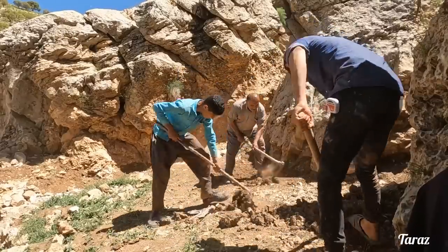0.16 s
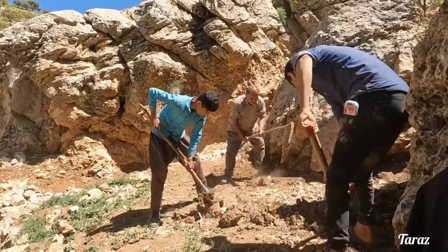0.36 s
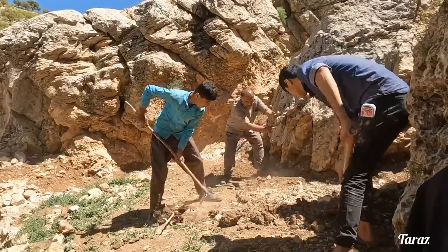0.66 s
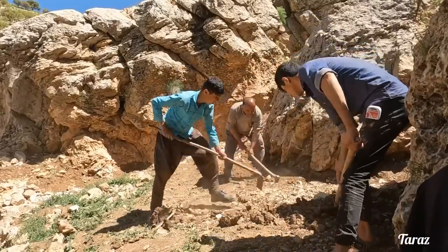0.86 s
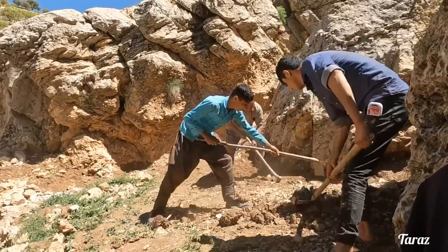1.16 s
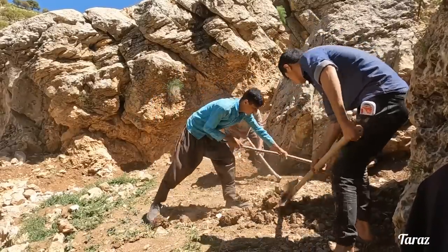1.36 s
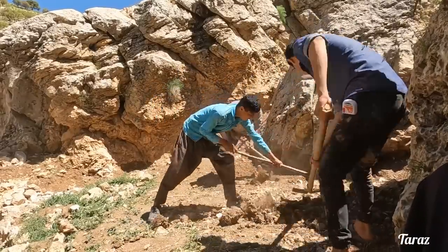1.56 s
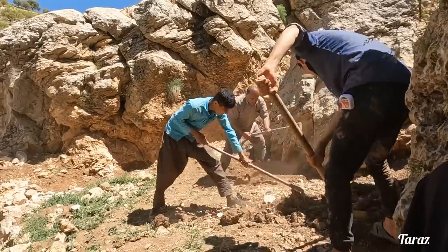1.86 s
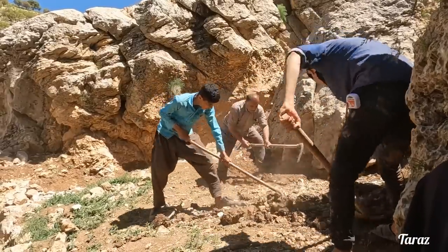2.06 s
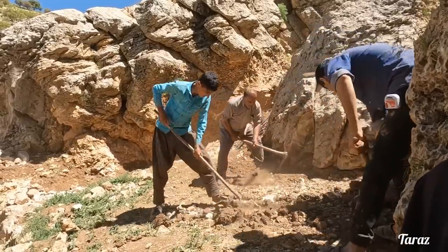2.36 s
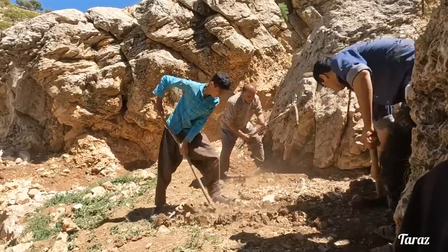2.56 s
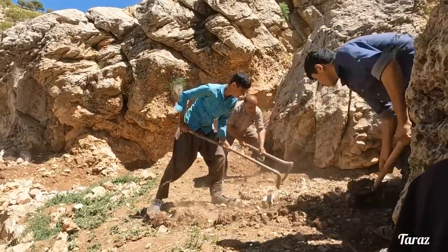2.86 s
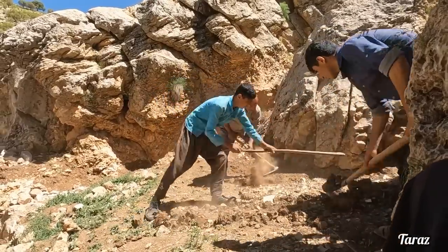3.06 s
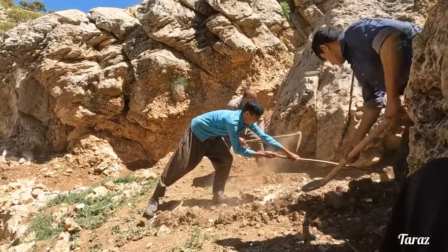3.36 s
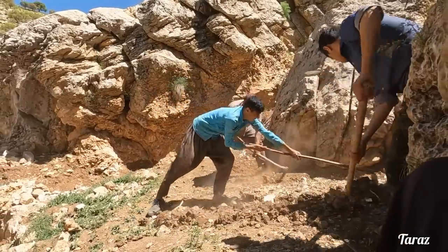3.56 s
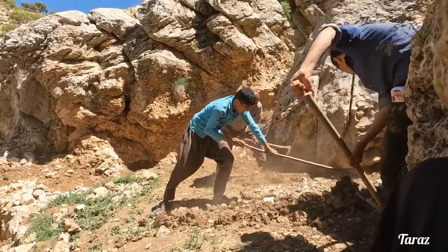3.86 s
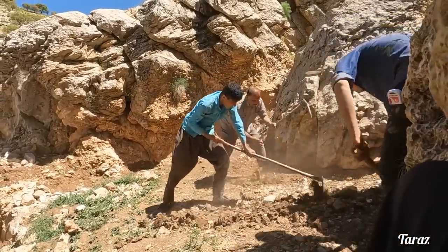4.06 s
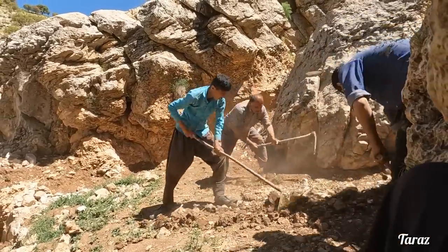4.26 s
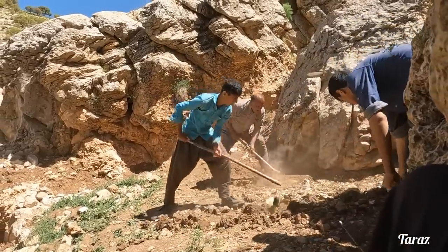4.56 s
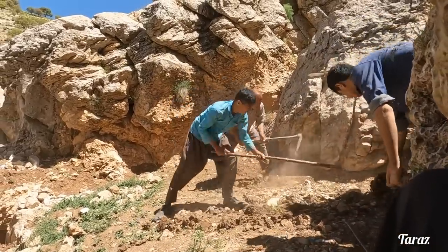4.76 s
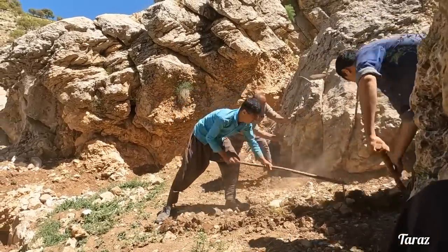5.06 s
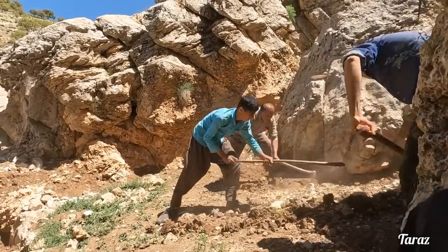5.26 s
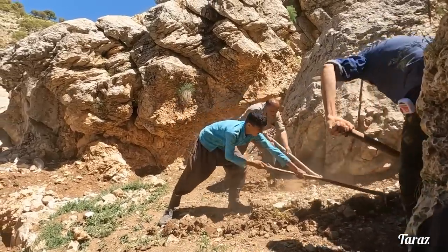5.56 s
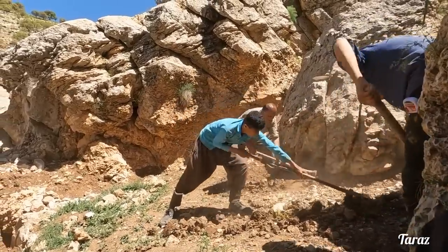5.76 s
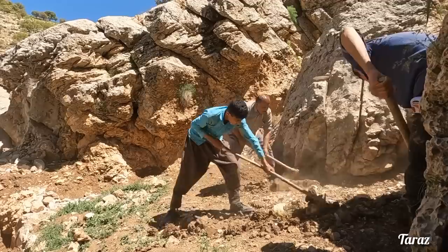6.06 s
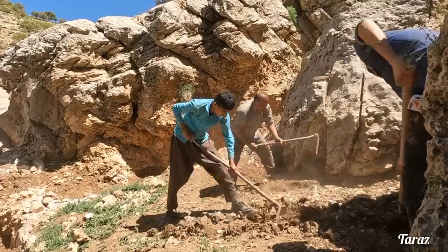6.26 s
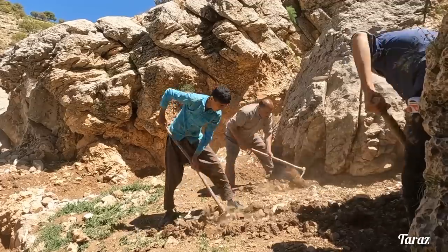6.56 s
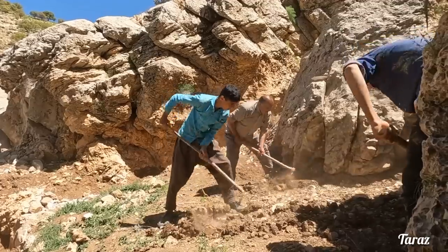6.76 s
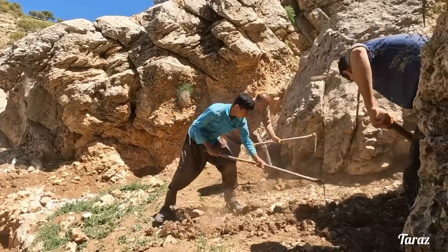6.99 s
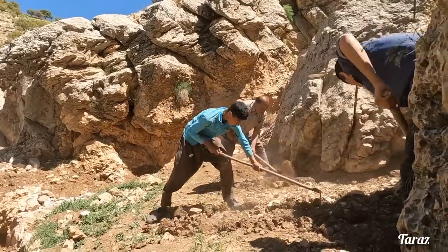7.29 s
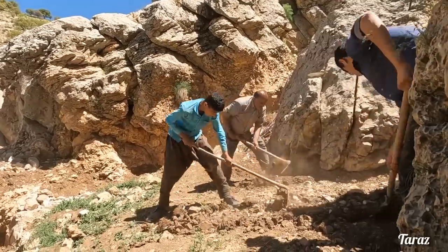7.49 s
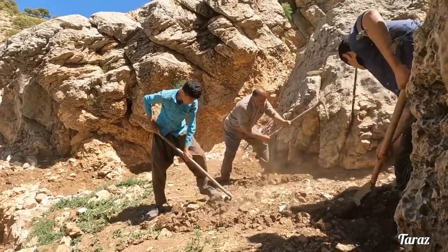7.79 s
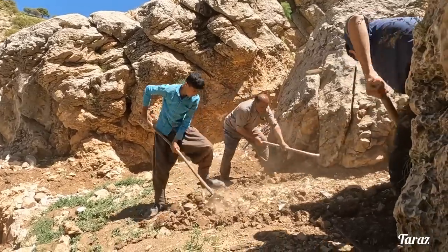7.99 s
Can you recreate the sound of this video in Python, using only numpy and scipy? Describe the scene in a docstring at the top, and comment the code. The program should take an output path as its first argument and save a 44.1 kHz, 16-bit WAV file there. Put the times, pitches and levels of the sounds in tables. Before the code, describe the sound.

Three workers dig rocky soil outdoors: gritty crunches, dull earth thumps, grating blades, knocking stones and brief metallic rings over loose gravel.

```python
"""Three workers dig dry, stony ground at a rock face with shovels and a pick; rumble, breeze and a thin echo run throughout.
It opens almost mono on a soft landing, gravel (filtered clicks), grates (slips striking blade modes) and the first
chops (crushed grit plus a damped thud), with clinks and stone knocks (gritty contacts ringing modes). From 2.4 s the image
opens; a shovel rings free at 2.8 s and the pick pings at 3.2 s (decaying sines). The loudest crunch and thud fall near 4.4 s.
Around 7.3 to 7.7 s knocks, clinks and the loudest gravel crowd together, then the gravel settles slowly to the end."""
import sys
import numpy as np
from scipy import signal
from scipy.fft import rfft, irfft, next_fast_len
from scipy.io import wavfile
from scipy.ndimage import uniform_filter1d

SR = 44100
rng = np.random.default_rng(int(sys.argv[2]) if len(sys.argv) > 2 else 0)


def digitize_waveform(pressure):
    """Quantize a signal to 16-bit integers and store it at the path in sys.argv[1].

    Rows of a 2-D input are taken as channels; values are limited to [-1, 1].
    """
    field = np.atleast_2d(pressure).T
    bounded = np.clip(field, -1, 1)
    quanta = np.round(bounded * 32767).astype(np.int16)
    wavfile.write(sys.argv[1], SR, quanta)


N = 358533
TIME = np.arange(N) / SR
SIDES = np.array([[1], [-1]])  # left, right sign of a side signal


def undb(db):
    """Decibels to gain."""
    return 10 ** (np.asarray(db) / 20)


def unit(x):
    """Scale to rms 1."""
    return x / np.sqrt(np.mean(x ** 2) + 1e-20)


def curves(table):
    """Each column of a timed table, sample by sample."""
    s, *columns = np.transpose(table)
    return [np.interp(TIME, s, c) for c in columns]


def shape(x, gain):
    """Filter by a gain over frequency with minimum phase, so that attacks stay sharp."""
    size = next_fast_len(len(x) + 4096, True) // 2 * 2
    f = np.maximum(np.fft.rfftfreq(size, 1 / SR), 1)
    cepstrum = irfft(np.log(gain(f) + 1e-5))
    # folding the cepstrum makes the filter causal
    cepstrum[1:size // 2] *= 2
    cepstrum[size // 2 + 1:] = 0
    return irfft(rfft(x, size) * np.exp(rfft(cepstrum)))[:len(x)]


def colour(points, f):
    """Gain of a (f/Hz, level/dB) spectrum at frequencies f."""
    hz, db = np.transpose(points)
    return undb(np.interp(np.log(f), np.log(hz), db))


def band(x, lo_hz, hi_hz, order=4):
    """Band-pass, scaled to rms 1."""
    edges = [lo_hz, min(hi_hz, SR / 2 - 1)]
    return unit(signal.sosfilt(signal.butter(order, edges, "band", fs=SR, output="sos"), x))


def hump(f, hz, octaves):
    """A broad resonance around hz, at half gain this many octaves away."""
    return 1 / (1 + (np.log2(f / hz) / octaves) ** 2)


def grains(size, rate, scatter_db):
    """Random clicks, rate per second at rms 1: scatter makes many small and a few large."""
    sizes = undb(scatter_db * np.minimum(rng.exponential(size=size), 4))
    present = rng.random(size) < rate / SR
    return unit(present * rng.choice([-1, 1], size) * sizes)


def peak(x, db, size=176):
    """Scale a hit so that its loudest 4 ms have this level."""
    return x * undb(db) / np.sqrt(uniform_filter1d(x ** 2, size).max() + 1e-20)


def add(out, s, x):
    """Mix x into out at time s."""
    i = max(int(s * SR), 0)
    out[i:i + len(x)] += x[:max(N - i, 0)]


def surge(crest, swell, settle):
    """Power of a moving mass: it gains 20 dB in swell seconds, then loses 20 dB every settle seconds."""
    distance = np.maximum((crest - TIME) / swell, (TIME - crest) / settle)
    return undb(-20 * distance.clip(0, 10)) ** 2


def thud(hz, delay_s, cycles):
    """A heavily damped low swing that begins after a delay."""
    late = np.maximum(TIME[:SR // 4] - delay_s, 0)
    onset = 1 - np.exp(-late * hz * 2 * np.pi)
    return np.sin(2 * np.pi * hz * late) * np.exp(-late * hz / cycles) * onset


# Spectrum of sliding gravel: f/Hz, level/dB
GRAVEL_COLOUR = [(150, -37), (250, -2), (420, -4.5), (635, -8), (1030, -8.5), (1430, -1), (2050, -0.5),
                 (3270, 1.5), (5130, -8), (9540, -18.5), (15500, -37)]
STRAY_PER_S, STRAY_DB = 20, -3.5  # tumbling larger stones
CHATTER_DB = -4  # ringing stones in the gravel
COARSE_DB = -53  # rattle level that brings the ringing stones into full play; gentler pushes roll fewer


def gravel(rattle, body, hiss):
    """Stones crack and knock dully against each other, in small slides over a dense rush of sand."""
    cracks = grains(N, rate=700, scatter_db=3.5)
    pebbles, t = np.zeros(N), TIME[:SR // 40]
    for when, size, pitch, hardness in rng.random((5000, 4)):
        hz = 600 * 12 ** pitch
        knock = np.sin(2 * np.pi * hz * t) * np.exp(-t * hz / (1.5 + 9 * hardness))
        add(pebbles, when * N / SR, knock * np.sqrt(hz / (size + .15)))
    sand = grains(N, rate=9000, scatter_db=0.0)
    grit = undb(-2) * cracks + undb(-5) * unit(pebbles) + sand
    # the heap gives way in fits and starts
    grit = grit * undb(2.16 * unit(uniform_filter1d(rng.standard_normal(N), size=500)))
    # now and then a larger stone tumbles and chatters
    stray = np.abs(grains(N, rate=STRAY_PER_S, scatter_db=2.0))
    tumbles = signal.oaconvolve(stray, np.exp(-t / 0.02))[:N]
    grit = unit(grit) + undb(STRAY_DB) * unit(tumbles * grains(N, rate=5000, scatter_db=2.0))
    coarse = np.minimum(rattle / undb(COARSE_DB), 1)
    grit = unit(grit) + undb(CHATTER_DB) * coarse * chatter()
    # the stones also patter on the steel and keep it humming
    tap = 1. * (TIME[:SR // 6] == 0)
    steel = blade(tap, hz=3000, octaves=3, free=0.5)
    grit = unit(grit) + undb(-17.0) * unit(signal.oaconvolve(grit, steel)[:N])
    grit = shape(grit, lambda f: colour(GRAVEL_COLOUR, f))
    return rattle * band(grit, 1530, 5470) + body * band(grit, 256, 1191) + hiss * band(grit, 5800, 18800)


# A blade pushes or tips gravel: crest t/s, swell t/s, settling t/s, rattle level/dB,
# heavy soil body level/dB and fine grit hiss level/dB (both over the rattle)
STROKES = [(0.01, 0.19, 0.033, -53.5, 6, -4.5), (0.2, 0.27, 0.5, -53, -2.5, -6.5),
           (0.31, 0.055, 0.11, -56.5, 8.5, -8), (0.56, 0.14, 0.27, -56, 1, -9),
           (0.855, 0.22, 0.1, -59, 4.5, -9.5), (1.22, 0.39, 0.97, -64, -1.5, -11),
           (1.58, 0.26, 0.18, -58, -1, -4), (1.83, 0.2, 0.36, -58, 2.5, -7.5),
           (1.92, 0.048, 0.065, -52.5, -4, -6), (2.2, 0.11, 0.17, -48, 2.5, -4),
           (2.29, 0.082, 0.19, -54, 5, -8), (2.42, 0.27, 0.7, -62, 2, -23),
           (2.66, 0.43, 0.46, -57.5, 3, -9), (3.35, 0.077, 0.66, -59.5, -23, -8.5),
           (3.55, 0.54, 0.73, -63.5, 1.5, -9), (4.06, 0.023, 0.084, -47.5, 0.5, -5.5),
           (4.2, 0.36, 0.72, -56, 1, -9.5), (4.99, 0.017, 0.18, -46.5, -3.5, -14.5),
           (5.8, 0.17, 0.25, -56.5, 1, -7.5), (5.98, 0.24, 0.45, -56.5, 0, -11),
           (6.27, 0.15, 0.24, -48, -3.5, -10), (6.4, 0.072, 0.76, -56, -8, -7.5),
           (6.74, 0.91, 0.087, -57.5, -3, -9.5), (7.03, 0.69, 1.12, -69.5, 3, -9),
           (7.37, 0.078, 0.13, -49.5, 0.5, -7), (7.52, 0.35, 0.2, -51.5, 1.5, -8),
           (7.612, 0.039, 0.072, -38.5, -13.5, -9.5), (7.76, 0.18, 0.53, -56.5, -6, -3),
           (7.9, 0.89, 5.9, -57, -11, -8)]
# grit thrown up by a chop: rattle relative to its crunch, then body and hiss relative to that rattle
DEBRIS_DB, DEBRIS_BODY_DB, DEBRIS_HISS_DB = -25, 8, -18
DEBRIS_SWELL_S, DEBRIS_SETTLE_S = 0.0047, 0.059


def flow():
    """Gain of the gravel's rattle, body and hiss: the strokes and the debris of each chop add in power."""
    debris = [(s + DEBRIS_SWELL_S, DEBRIS_SWELL_S, DEBRIS_SETTLE_S, db + DEBRIS_DB, DEBRIS_BODY_DB, DEBRIS_HISS_DB)
              for s, db, *_ in CHOPS]
    power = np.zeros((3, N))
    for crest, swell, settle, db, body_db, hiss_db in list(STROKES) + debris:
        levels = undb(db + np.array([0, body_db, hiss_db])) ** 2
        power += np.outer(levels, surge(crest, swell, settle))
    return np.sqrt(power)


CHATTER_CYCLES, BOUNCE_S = 8.5, 0.007  # ring decay in cycles, mean time between bounces


def chatter():
    """Hard stones, each with its own pitch, bounce a few times and ring briefly."""
    out, t = np.zeros(N), TIME[:SR // 30]
    for when, size, pitch, overtone, *gaps in rng.random((450, 8)):
        hz = 1100 * 5.5 ** pitch
        upper_hz = hz * (1.2 + .5 * overtone)
        tones = np.sin(2 * np.pi * hz * t) + .5 * np.sin(2 * np.pi * upper_hz * t)
        ring = tones * np.exp(-t * hz / CHATTER_CYCLES)
        for k, s in enumerate(np.cumsum(gaps) * 2 * BOUNCE_S):
            add(out, when * N / SR + s, ring * 0.7 ** k / (size + .35))
    return unit(out)


# Modes of the steel blade: f/Hz (before a slight random detune), level/dB, t60 in the air t/s
BLADE = [(643, 1.5, 0.1), (1300, 8.5, 0.14), (1445, 10, 0.15), (1837, -4, 0.51), (1960, -2.5, 0.48),
         (2100, -20, 0.059), (2250, 3, 0.59), (2605, -3, 0.5), (2917, 2.5, 0.27), (3170, -5, 0.5),
         (3550, 5, 0.35), (4400, 6.5, 0.23), (5100, 4, 0.16), (7000, 3, 0.29), (7100, -8, 0.51)]


def blade(push, hz, octaves, free):
    """The blade's modes; the contact favours those near hz, and soil shortens them (free = 1 in the air)."""
    t = TIME[:len(push)]
    f, db, t60 = np.transpose(BLADE)[:, :, None]
    f = f * (1 + 0.0078 * rng.standard_normal(f.shape))
    ring = np.sin(2 * np.pi * f * t) * undb(-60 * t / (t60 * free))
    modes = signal.fftconvolve(ring, push[None], axes=1)[:, :len(t)]
    modes = modes / np.abs(modes).max(axis=1, keepdims=True)
    return np.sum(modes * undb(db) * hump(f, hz, octaves), axis=0)


# Spectrum of crushed grit and cracking stone: f/Hz, level/dB
CRUNCH_COLOUR = [(100, 2), (220, -4.5), (380, -12.5), (600, -8), (900, -18.5), (1400, -12), (2700, -12.5),
                 (4000, -17.5), (5600, -20), (8000, -37), (15500, -49.5)]
# Blade or clod driven into the earth: t/s, crunch level/dB, thud level/dB (before a 1 dB lift),
# thud f/Hz, brightness in dB per octave
CHOPS = [(0.321, -36, -44, 109, -2.5), (0.982, -48.5, -44, 152, 2), (2.239, -36, -32.5, 62, -1.5),
         (2.273, -39, -35.5, 60, -2.5), (3.005, -31, -30.5, 100, -1.5), (3.039, -43.5, -43.5, 130, 0.5),
         (3.671, -40, -40, 89, 2.5), (4.108, -37, -45, 69.3, -2), (4.441, -30, -27.5, 55.8, 2),
         (5.381, -31.5, -32, 48, 1.5), (5.411, -46, -37, 86, 1.5), (6.228, -40.5, -36, 92, 2.5),
         (7.329, -34, -52, 220, -1.5), (7.85, -39, -45.5, 123, 0.5)]


def chops():
    """The edge crushes grit for a few milliseconds, the handle knocks, then the ground stops it with a thud."""
    out, t = np.zeros(N), TIME[:SR // 4]
    for s, crunch_db, thud_db, thud_hz, tilt_db in CHOPS:
        crush = np.exp(-np.maximum(t - .007, 0) / 0.0025) + undb(-8.5) * np.exp(-t / 0.021)
        crunch = shape(grains(len(t), rate=12000, scatter_db=2.5) * crush,
                       lambda f: colour(CRUNCH_COLOUR, f) * undb(tilt_db * np.log2(f / 2000)))
        handle = -thud(216, delay_s=0.00294, cycles=1.04)
        ground = thud(thud_hz, delay_s=0.0072, cycles=1.06)
        steel = blade(crunch, hz=3000, octaves=2.6, free=0.17)  # buried steel rings only briefly
        low = peak(0.89 * handle + ground, thud_db + 1)
        add(out, s, peak(crunch, crunch_db) + peak(steel, crunch_db - 11.5) + low)
    return out


# Steel knocks a stone: t/s, level/dB, stone f/Hz, its width in octaves (held to at least 0.04),
# blade ring level/dB over the stone
CLINKS = [(0.291, -45, 1270, 0.56, -14), (0.4779, -41.5, 2210, 0.05, -3.5), (0.542, -39.5, 4770, 0.19, -9),
          (1.2835, -44, 1770, 0.53, -4.5), (1.3746, -50.5, 3400, 1, -10), (1.7295, -48, 2900, 1, -17),
          (2.181, -53, 1200, 0.91, -10), (2.756, -52.5, 2290, 0.98, 2), (3.005, -30, 2780, 0.64, -27),
          (3.157, -38.5, 2300, 0.53, -16), (3.631, -44.5, 3060, 1, -15), (4.037, -45, 2200, 1, 1.5),
          (4.2942, -42.5, 2920, 1, -10.5), (4.344, -46.5, 2940, 0.99, -5), (4.9725, -43.5, 1430, 1, 1),
          (4.9914, -39, 1430, 1, -8), (5.148, -44, 3000, 0.39, -8.5), (5.614, -51, 3470, 1, -2.5),
          (6.076, -42.5, 4400, 0.31, -6.5), (6.092, -36.5, 3380, 0.15, -8.5), (6.656, -49, 1790, 1, -3),
          (6.74, -50, 2940, 0.46, -4), (7.215, -47.5, 2820, 1, -4.5), (7.429, -37.5, 5340, 0.06, -5),
          (7.473, -34.5, 3900, 0.66, -20), (7.511, -33.5, 3170, 0.89, -5.5), (7.581, -39, 6100, 0.48, -10),
          (7.7232, -36.5, 2100, 0.075, -11)]


def clinks():
    """A stone cracks against the blade and chatters briefly; the steel rings on, damped by the soil."""
    out, t = np.zeros(N), TIME[:SR // 4]
    for s, db, hz, octaves, ring_db in CLINKS:
        touch = np.exp(-t / 0.0044) + undb(-20) * np.exp(-t / 0.036)
        contact = grains(len(t), rate=8000, scatter_db=2.5) * touch
        # the stone's own resonance stands on a broad crack
        stone = shape(contact, lambda f: (hump(f, hz, max(octaves, .04)) + 0.031) * colour(CRUNCH_COLOUR, f) ** 0.58)
        steel = blade(contact, hz, octaves=1.0, free=0.26)
        add(out, s, peak(stone, db) + peak(steel, db + ring_db))
    return out


# Blade grates over rock: t/s, length t/s (a short fade follows), level/dB, strongest f/Hz,
# grinding grit level/dB over the blade
GRATES = [(0.182, 0.036, -40, 720, -7.5), (1.192, 0.023, -52, 1710, 1), (2.174, 0.048, -43, 1300, -6),
          (3.308, 0.13, -59, 1970, -11), (3.544, 0.019, -62, 3630, 5), (4.059, 0.016, -51, 1930, 7),
          (4.983, 0.016, -43, 1430, -22), (5.017, 0.0055, -39, 1410, -12), (6.324, 0.041, -48.5, 1850, -5),
          (7.37, 0.022, -46.5, 1450, -3), (7.576, 0.015, -47.5, 5130, 8), (7.698, 0.052, -48.5, 4400, -13)]


def grates():
    """The blade sticks and slips on rock; every slip strikes its modes and grinds the grit beneath."""
    out, t = np.zeros(N), TIME[:SR // 3]
    for s, length, db, hz, grit_db in GRATES:
        pressure = np.minimum(t / 0.0018, 1) * np.exp(-np.maximum(t - length, 0) / 0.017)
        slips = grains(len(t), rate=450, scatter_db=0.0) * pressure
        grit = shape(grains(len(t), rate=12000, scatter_db=-0.5) * pressure,
                     lambda f: hump(f, hz, 0.88) * colour(GRAVEL_COLOUR, f) ** 0.28)
        steel = blade(slips, hz, octaves=0.3, free=0.42)
        add(out, s, peak(steel, db) + peak(grit, db + grit_db))
    return out


# Stone knocks on stone: t/s, level/dB, f/Hz
STONES = [(0.11, -49, 3980), (0.184, -39, 727), (0.322, -42, 3380), (0.4947, -40, 3300),
          (0.58, -44.5, 2790), (1.207, -47.5, 1300), (1.225, -42.5, 1470), (1.256, -42, 1970),
          (1.556, -49, 1720), (1.601, -49, 3520), (1.795, -47.5, 2400), (1.838, -46.5, 3340),
          (1.864, -44, 2860), (1.899, -49, 2520), (1.924, -47.5, 4250), (2.16, -43.5, 718),
          (2.2365, -39.5, 2570), (2.962, -48.5, 2480), (3.233, -54, 2400), (3.784, -47.5, 2470),
          (4.169, -39.5, 1970), (4.21, -49, 2100), (4.537, -45.5, 2730), (5.973, -47.5, 550),
          (6.246, -41.5, 672), (6.277, -44.5, 5500), (6.351, -46, 1950), (6.584, -46.5, 4070),
          (6.833, -53.5, 6860), (6.849, -51, 7400), (7.3081, -34.5, 2400), (7.3294, -36.5, 1106),
          (7.363, -31.5, 1420), (7.6106, -43, 3170), (7.732, -39, 2100), (7.746, -43, 2100),
          (7.81, -44.5, 2290), (7.955, -47.5, 4600), (8.097, -43, 2620)]
STONE_CYCLES, STONE_CRACK_DB = 6.4, -7.5  # ring decay in cycles, crack relative to the ring
REBOUND_DB, REBOUND_S = -10, 0.0065  # rebound level and its mean delay


def stones():
    """A gritty contact and a rebound ring a few short modes, spaced differently in every stone."""
    out, t = np.zeros(N), TIME[:SR // 10]
    for (s, db, hz), (gap, *spacing) in zip(STONES, rng.random((len(STONES), 4))):
        after = t - REBOUND_S * (.5 + gap)
        rebound = undb(REBOUND_DB) * (after > 0) * np.exp(-np.abs(after) / 0.0023)
        touch = np.exp(-t / 0.0016) + rebound + undb(-19.5) * np.exp(-t / 0.026)
        contact = grains(len(t), rate=9000, scatter_db=3.5) * touch
        ratios = np.array([.62, 1.26, 1.5]) + np.array([.2, .12, .5]) * spacing
        f = hz * np.r_[1, ratios][:, None]
        rings = np.sin(2 * np.pi * f * t) * np.exp(-t * f / STONE_CYCLES)
        modes = signal.fftconvolve(rings, contact[None], axes=1)[:, :len(t)]
        ring = sum(peak(mode, mode_db) for mode, mode_db in zip(modes, (0, -11, -7.5, -14)))
        crack = shape(contact, lambda f: colour(CRUNCH_COLOUR, f))
        add(out, s, peak(peak(ring, 0) + peak(crack, STONE_CRACK_DB), db))
    return out


def struck(hits, modes):
    """Steel tapped once and left to ring in its modes."""
    out, t = np.zeros(N), TIME[:SR // 2]
    ring = sum(undb(db - 60 * t / t60) * np.sin(2 * np.pi * hz * t) for hz, db, t60 in modes)
    for s, db in hits:
        add(out, s, peak(ring, db))
    return out


# Hits on the near shovel, lifted clear: t/s, level/dB
RINGS = [(2.768, -50)]
# Its modes in the air: f/Hz, level/dB, t60 t/s
FREE_SHOVEL = [(2170, 1, 0.61), (2290, -11, 0.79), (2660, -9.5, 0.71), (4398, -21, 0.31), (5070, -11, 0.25)]


def free_shovel():
    """The lifted shovel has no soil to damp it, so its modes ring long."""
    return struck(RINGS, FREE_SHOVEL)


# The pick's point on rock: t/s, level/dB
PINGS = [(3.1563, -40), (3.1598, -36.5), (3.169, -45)]
# Modes of the pick head: f/Hz, level/dB, t60 t/s
PICK = [(1230, -4, 0.13), (2400, 0, 0.051), (2864, 7, 0.038), (4400, -20, 0.044), (5350, -31, 0.039)]


def pick():
    """The point taps rock and the compact head pings with a fast decay."""
    return struck(PINGS, PICK)


# A boot or a soft clod hits the ground: t/s, level/dB, f/Hz
THUDS = [(1.002, -40.5, 169), (1.516, -46, 158), (3.764, -50.5, 100), (4.867, -43, 185), (6.161, -36, 138),
         (6.361, -35, 71), (7.12, -44, 59.5)]


def thuds():
    """Boots and soft clods thump the ground without a crunch."""
    out = np.zeros(N)
    for s, db, hz in THUDS:
        add(out, s, peak(thud(hz, delay_s=0, cycles=1.23), db))
    return out


# Spectrum of the low end: f/Hz, level/dB
RUMBLE_COLOUR = [(11, -54), (19, 1), (38, 2.5), (107, -9), (220, -17), (389, -26.5), (500, -17.5),
                 (650, -55), (1100, -120)]
# Heavy soil and boots land: crest t/s, swell t/s, settling t/s, clod thump level/dB,
# ground boom level/dB (before the mix gains below)
LANDINGS = [(0.01, 0.043, 0.095, -37, -35), (0.28, 0.25, 0.1, -50, -47.5), (1.0, 0.16, 0.16, -46, -46.5),
            (2.27, 0.41, 0.11, -57, -55), (2.76, 0.49, 0.5, -58.5, -54), (3.026, 0.036, 0.1, -44.5, -51.5),
            (4.19, 0.25, 0.042, -52, -46), (4.47, 0.014, 0.18, -48, -40.5), (5.372, 0.2, 0.13, -44, -34),
            (6.28, 0.45, 0.4, -48.5, -41.5), (6.62, 0.09, 0.23, -54.5, -54), (7.39, 0.23, 0.43, -56, -48),
            (7.86, 0.06, 0.068, -52, -58)]
# Air and ground rumble: t/s, level/dB (before the trims below)
BREEZE = [(0.0, -40.5), (0.5, -55), (0.95, -51), (1.22, -86), (1.47, -88), (1.72, -56.5), (3.42, -56.5),
          (4.14, -61), (4.28, -48.5), (5.53, -44), (6.32, -48.5), (6.68, -61), (7.02, -53.5), (7.43, -52.5),
          (8.13, -60.5)]
BREEZE_DB, BREEZE_THUMP_DB = -5, -18  # trim of the breeze, and its flutter above 100 Hz relative to that
SOIL_THUMP_DB = -1  # clods that tumble with the gravel, relative to its body


def rumble(soil):
    """Air buffets the two ports low and smoothly; clods and boots land as soft separate thumps."""
    wind = undb(curves(BREEZE)[0] + BREEZE_DB)
    low = wind ** 2  # power
    thump = (undb(BREEZE_THUMP_DB) * wind) ** 2 + (undb(SOIL_THUMP_DB) * soil) ** 2
    for crest, swell, settle, thump_db, boom_db in LANDINGS:
        weight = surge(crest, swell, settle)
        low = low + undb(boom_db) ** 2 * weight
        thump = thump + undb(thump_db) ** 2 * weight
    noise = shape(rng.standard_normal(N), lambda f: colour(RUMBLE_COLOUR, f))
    breeze = band(noise, 20.0, 113.6, order=3)
    eddies = band(rng.standard_normal(N), 26, 96, order=2)  # opposite in the two ports
    lumps = shape(grains(N, rate=250, scatter_db=4.5), lambda f: colour(RUMBLE_COLOUR, f))
    clods = band(lumps, 102.8, 294, order=3)
    boom = np.sqrt(low) * (undb(2.0) * breeze + undb(-12.0) * SIDES * eddies)
    return boom * undb(-1.1 * SIDES) + np.sqrt(thump) * clods


# Diffuse treble: from f/Hz, to f/Hz, side minus mid level/dB (before the width is set)
SPREAD = [(1200, 5500, -20.5), (5570, 9230, -7.5), (9600, 12700, -5)]


def scattered(x):
    """Stony ground scatters treble: unrelated in the two ports, it rises and falls with the direct sound."""
    side = np.zeros(N)
    for lo_hz, hi_hz, db in SPREAD:
        direct = signal.sosfilt(signal.butter(3, [lo_hz, hi_hz], "band", fs=SR, output="sos"), x)
        envelope = np.sqrt(np.abs(uniform_filter1d(direct ** 2, size=90)))
        side += undb(db) * envelope * band(rng.standard_normal(N), lo_hz, hi_hz, order=3)
    return side


def rock_face(x, wet_db, t60):
    """A thin, scattered echo from the broken rock, different on each side."""
    t = TIME[:SR // 2]
    fade = undb(-60 * t / t60) * (t > .014)  # nothing returns in the first 14 ms
    echoes = [band(grains(len(t), rate=3800, scatter_db=9.5), 610, 8900, order=1) * fade for _ in range(2)]
    return undb(wet_db) * np.array([signal.oaconvolve(x, e / np.linalg.norm(e))[:N] for e in echoes])


# Spectrum of the outdoor air: f/Hz, level/dB
AIR = [(30, 8), (123, -24), (746, -27.5), (3580, -18), (7060, -23.5), (15500, -36)]


def air():
    """A faint steady bed of coloured noise."""
    return undb(-71) * unit(shape(rng.standard_normal(N), lambda f: colour(AIR, f)))


def scene():
    """All the digging, widened by scatter from the nearby ground, over low rumble and faint outdoor air."""
    rattle, body, hiss = flow()
    tools = gravel(rattle, body, hiss) + chops() + clinks() + grates() + stones() + free_shovel() + pick()
    mid = tools + air()
    echo = rock_face(tools, wet_db=-22.5, t60=0.2)
    return mid + SIDES * scattered(mid) + thuds() + rumble(body) + echo


# Colour of the two ports: f/Hz, left minus right level/dB
PORTS = [(1000, -0.5), (2500, 0), (5500, 2), (7500, 6), (10500, -0.5)]
# Stereo width, narrow at first and then open: t/s, side level/dB
WIDTH = [(0, -37), (2.4, -34), (3, -11), (4, -2), (8, 1.5)]
HOLLOW_HZ, TOP_HZ = 10960, 15650  # treble hollow while the image is narrow; steep top cut


def record(dry):
    """The left port is later and mostly brighter; the image widens, a treble hollow fills, the top is cut."""
    size = next_fast_len(N + 64, True) // 2 * 2
    f = np.maximum(np.fft.rfftfreq(size, 1 / SR), 1)
    lag_s = 2.6e-5
    ports = colour(PORTS, f) ** (SIDES / 2) * np.exp(-1j * np.pi * f * lag_s * SIDES)
    left, right = irfft(rfft(dry, size) * ports)[:, :N]
    width = undb(curves(WIDTH)[0])
    mid, side = (left + right) / 2, (left - right) / 2
    treble = signal.lfilter(*signal.iirpeak(HOLLOW_HZ, 4.5, fs=SR), mid)
    hollow = treble * 0.58 * (1 - width).clip(0, 1)
    both = mid - hollow + SIDES * width * side
    return signal.sosfilt(signal.ellip(10, .2, 70, TOP_HZ, fs=SR, output="sos"), both)


dry = scene()
out = record(dry)
digitize_waveform(out)
```